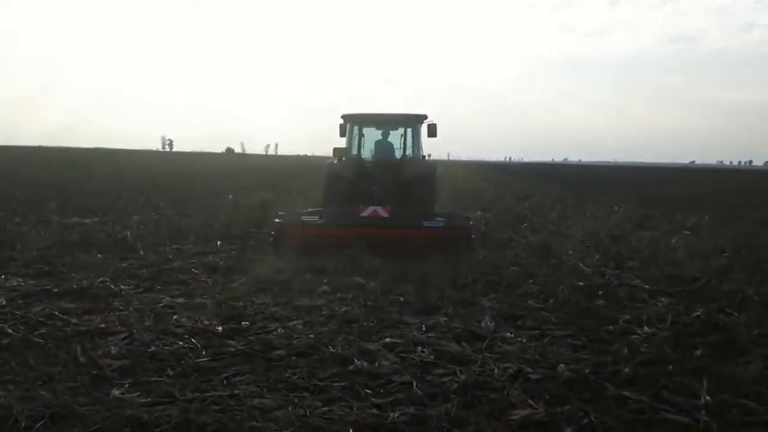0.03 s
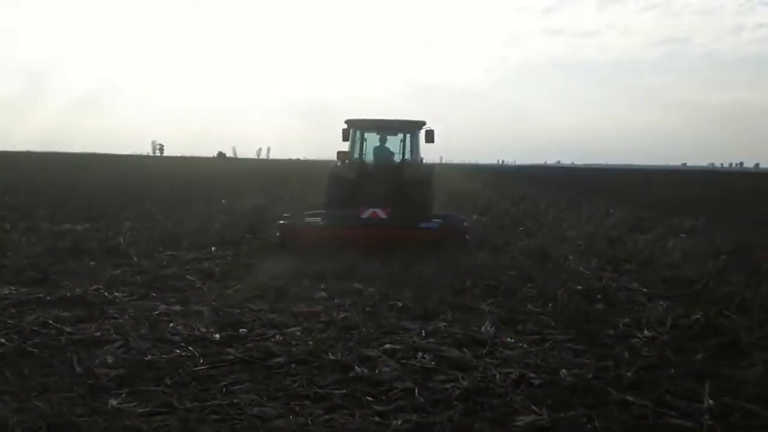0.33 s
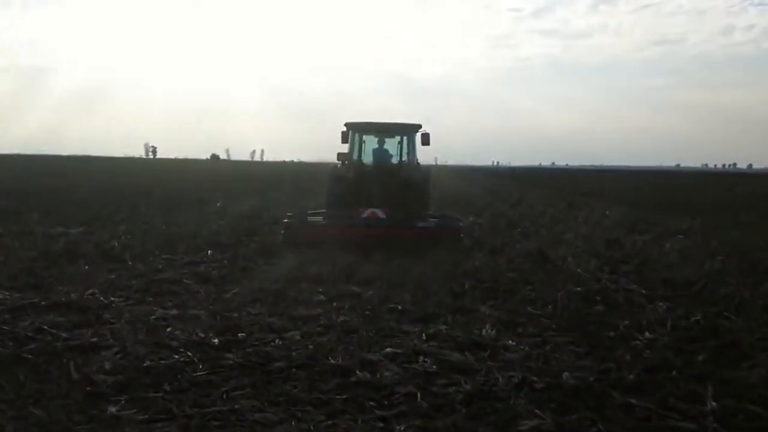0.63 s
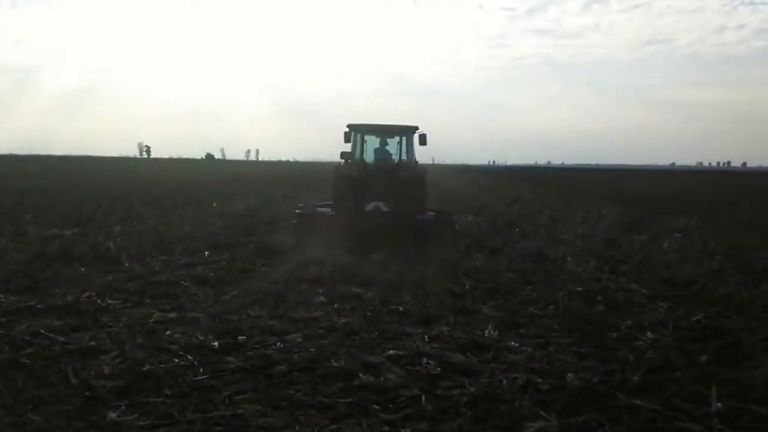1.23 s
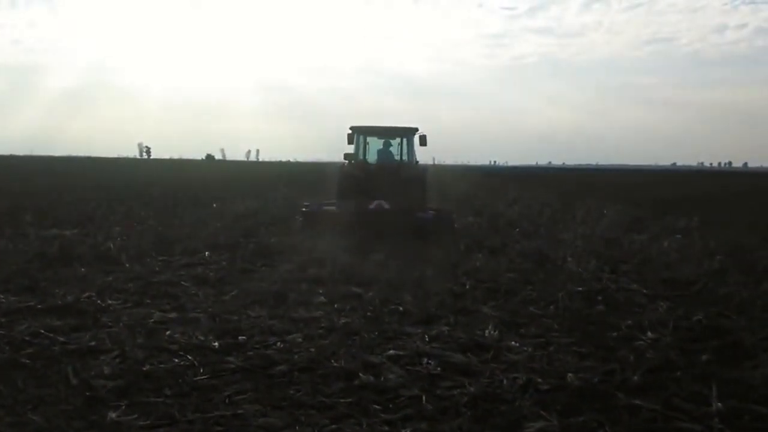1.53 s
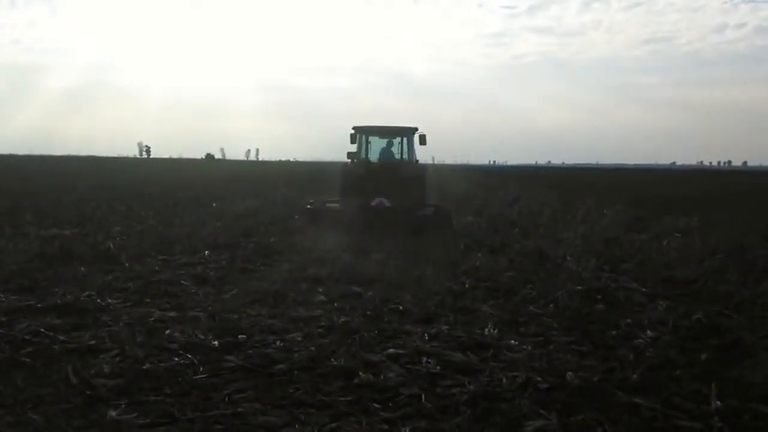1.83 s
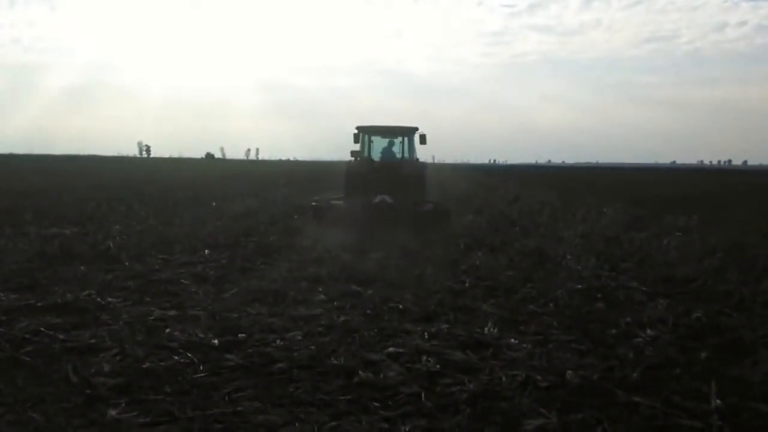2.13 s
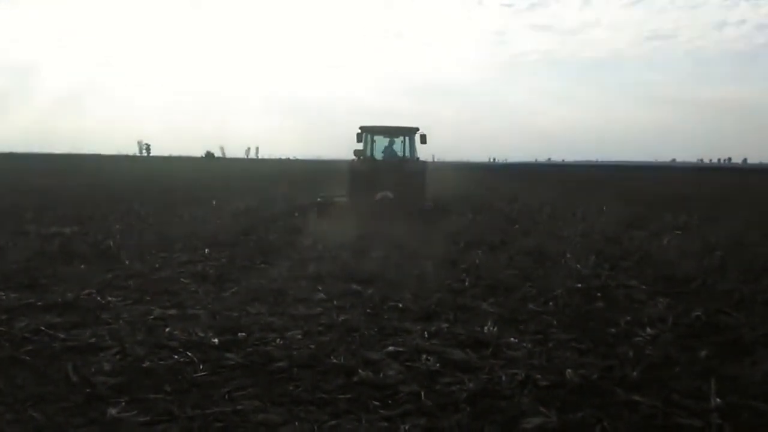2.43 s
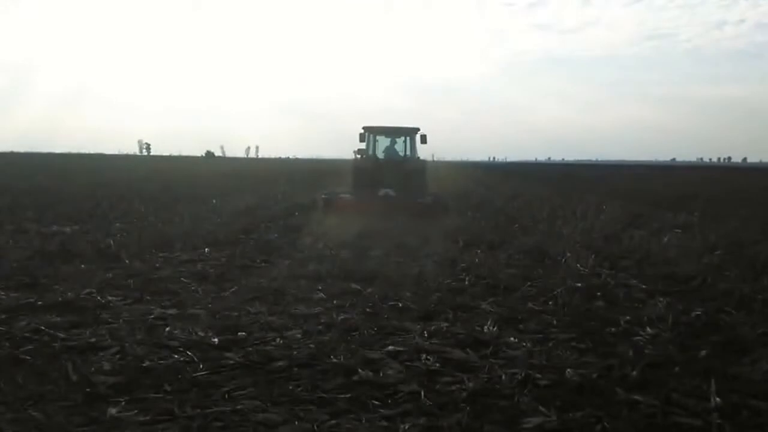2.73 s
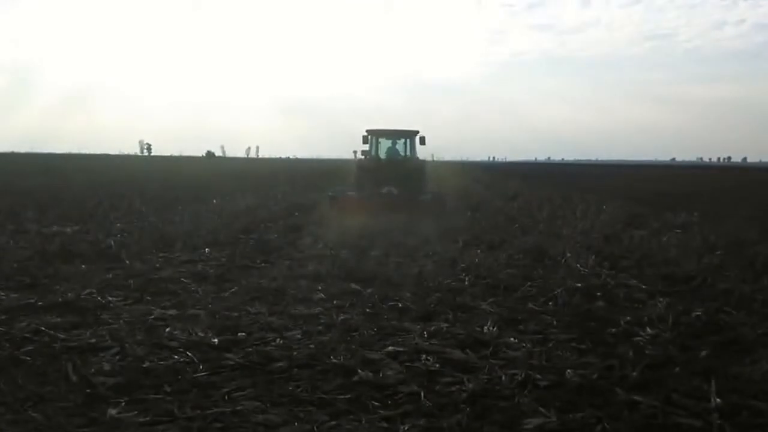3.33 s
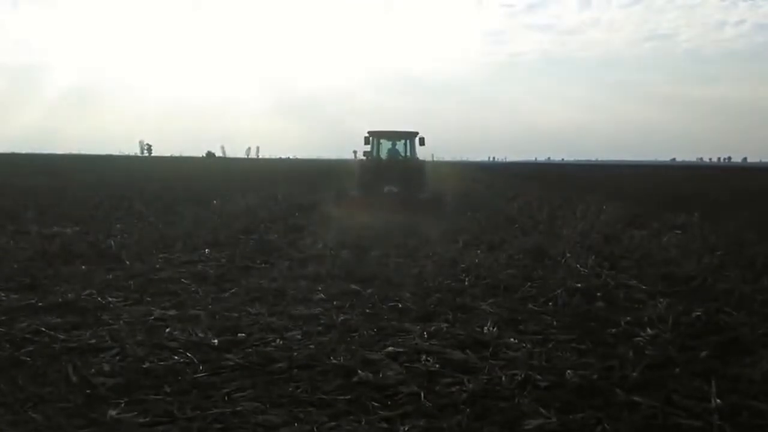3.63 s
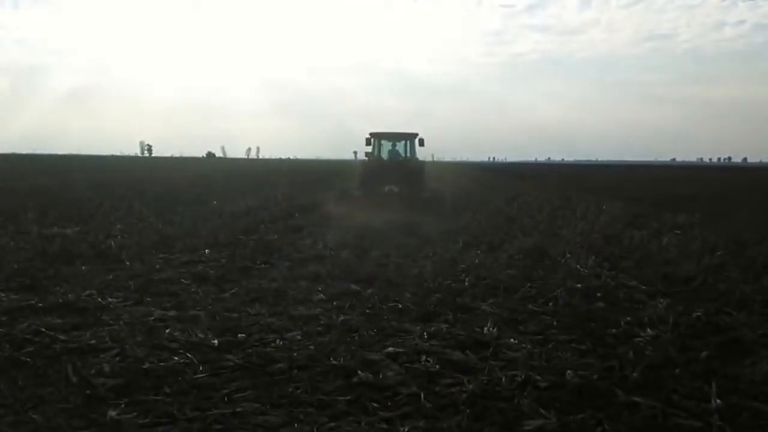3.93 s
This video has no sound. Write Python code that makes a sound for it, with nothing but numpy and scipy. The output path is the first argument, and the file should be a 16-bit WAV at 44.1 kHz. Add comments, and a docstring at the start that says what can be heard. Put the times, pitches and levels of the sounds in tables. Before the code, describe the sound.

A tractor engine drones and clatters as it pulls a shredder across an open field. Dry stalks crack irregularly against the steel hood and chaff hisses out. Heard from behind, it gradually grows fainter.

```python
"""Tractor shredding dry stalks

A four-cylinder tractor drives away over a field, pulling a flail shredder (swinging blades under a
steel hood). The exhaust drones, the engine block clatters and a fan slowly gains speed. Stalks crack
against the hood and chaff sprays out behind it. It is all heard in stereo, in the open air."""
import sys
import numpy as np
from scipy.fft import rfft, irfft, next_fast_len
from scipy.io import wavfile
from scipy.ndimage import map_coordinates

SR = 44100
rng = np.random.default_rng(int(sys.argv[2]) if len(sys.argv) > 2 else 0)


def dump_mix(stems):
    """Bounce the given channels to the path in sys.argv[1] as a 16-bit WAV at rate SR."""
    frames = np.atleast_2d(stems).T  # one column per channel
    limited = np.clip(frames, -1, 1)  # hard clip at full scale
    pcm = np.round(limited * 32767).astype(np.int16)
    wavfile.write(sys.argv[1], SR, pcm)


N = 176400  # 4 seconds
TOP_HZ = 15850  # upper edge of the treble


def amp(db):
    """Turn decibels into a plain multiplier."""
    return 10 ** (np.asarray(db) / 20)


def unit(x):
    """Scale a signal to an average power of 1."""
    return x / np.sqrt(np.mean(x ** 2) + 1e-20)


def along(points, hz):
    """Read between (frequency, value) points, with octaves evenly spaced."""
    freqs, values = np.transpose(points)
    return np.interp(np.log(hz + 1), np.log(freqs + 1), values)


def curves(rows):
    """Join a table's rows over time: one curve for each column after the first."""
    times, *columns = np.transpose(rows)
    return [np.interp(np.arange(N) / SR, times, column) for column in columns]


def wobble(rate, size=N):
    """A smooth curve through `rate` random values a second."""
    values = rng.standard_normal(size // 8 + 8)
    return map_coordinates(values, [np.arange(size) * rate / SR + 2], mode="mirror")


def filtered(x, response):
    """Turn each frequency up or down, and delay it, as response(hz) says."""
    n = x.shape[-1]
    padded = next_fast_len(n + 8192)
    return irfft(rfft(x, padded) * response(np.fft.rfftfreq(padded, 1 / SR)), padded)[..., :n]


def noise(gain, size=N):
    """Two noises shaped by gain(hz): one for direct sound, one for scattered sound."""
    return unit(filtered(rng.standard_normal((2, size)), gain))


def resonance(hz, centre, width):
    """A filter that rings at one pitch: the narrower, the longer."""
    return 1j * hz * width / (centre ** 2 - hz ** 2 + 1j * hz * width)


# The fan's hum (time [s], blades passing [Hz], level [dB])
FAN_HUM = [(0, 146, -32.5), (1.3, 156.7, -31), (3, 163.4, -31), (3.9, 172.7, -28.5)]

def fan():
    """The cooling fan's blades make a hum that creeps up in pitch."""
    hz, db = curves(FAN_HUM)
    level = np.sqrt(2) * amp(db + 0.8 * wobble(rate=4))
    phase = 2 * np.pi * np.cumsum(hz) / SR + 0.47 * wobble(rate=3.2)
    return level * np.sin(phase) * [[1], [0]]  # direct sound only


# The pipe's hollow ring (time [s], level [dB])
PIPE_LEVEL = [(0, -28), (.72, -26.5), (2.8, -34.5), (4, -44)]

def pipe(ring_hz=285.9, width_hz=20.7):
    """Flowing gas makes the exhaust pipe ring hollowly."""
    return amp(curves(PIPE_LEVEL)[0]) * noise(lambda hz: resonance(hz, ring_hz, width_hz) ** 2)


# The engine's clatter (time [s], relative level [dB])
CLATTER_LEVEL = [(0, -27.5), (1.4, -27.5), (2, -28.5), (2.8, -27.5), (3.55, -31), (3.92, -25)]
# What the engine block lets through (frequency [Hz], gain [dB])
BLOCK_TONE = [(250, -22), (420, -10), (670, 1.5), (790, 0), (1000, -11.5), (2200, -16.5), (9000, -77)]

def clatter(firings, rough_db=2):
    """Knocks that repeat every four firings and the pulsing noise of burning fuel shake the block."""
    block = lambda hz: amp(along(BLOCK_TONE, hz))
    places, sizes = rng.random(40), rng.standard_normal(40)  # 40 knocks in each engine cycle
    cycles = np.arange(int(firings[-1] / 4))[:, None]
    at = np.interp(4 * (cycles + places), firings, np.arange(N))
    hits = sizes * amp(0.83 * rng.standard_normal(at.shape))
    clicks = np.bincount(at.astype(int).ravel(), hits.ravel(), N)
    knocks = unit(filtered(clicks, block)) * [[1], [0]]
    burning = noise(block) * (1 + 0.35 * np.cos(2 * np.pi * firings))
    level = amp(curves(CLATTER_LEVEL)[0] + 2.05 * wobble(rate=13) - 6)
    return level * (knocks + amp(rough_db) * burning)


# The growl under the hood (time [s], level [dB])
CHURN_LEVEL = [(0, -27.5), (.16, -18), (.55, -29), (1.32, -26.5), (1.7, -63)]
# Pitches at which the air there rings (pitch [Hz], width [Hz], relative level [dB])
AIR_RINGS = [(374, 88, -9), (500, 24, -7), (590, 90, -4.5), (664, 77, -2), (790, 180, -7)]

def churn(swell_db=4, rough_db=2):
    """The flails beat the air under the hood into a rough growl whose pitches swell at random."""
    growl = sum(amp(db + swell_db * wobble(rate=14)) * noise(lambda hz: resonance(hz, pitch, width) ** 2)
                for pitch, width, db in AIR_RINGS)
    return amp(curves(CHURN_LEVEL)[0]) * unit(growl * amp(rough_db * wobble(rate=90)))


# How loud the high hiss is as it swells and fades (time [s], relative level [dB])
SPRAY_LEVEL = [(0, -32), (.15, -22), (.27, -30.5), (.37, -22.5), (.55, -29), (.66, -25), (.95, -30.5),
               (1.04, -27.5), (1.14, -34.5), (1.22, -26.5), (1.32, -23), (1.4, -35), (1.53, -29),
               (1.7, -40), (1.9, -33.5), (2.15, -33.5), (2.67, -44.5), (2.74, -37), (2.97, -41),
               (3.07, -39.5), (3.31, -38.5), (3.44, -43), (3.6, -35.5), (3.76, -42), (3.83, -34.5)]
# The tone of the hiss (frequency [Hz], gain [dB])
CHAFF_TONE = [(900, -17.5), (1700, 0.5), (2500, -1), (3050, 0), (3700, 3), (5500, -1), (8000, 1),
              (12000, -4), (15500, -10)]

def spray(boost_db=7):
    """Dry chaff flies out behind the shredder with a grainy hiss."""
    grains = amp(-0.5 * wobble(rate=370) + 1.47 * wobble(rate=90))
    hiss = noise(lambda hz: amp(along(CHAFF_TONE, hz)))
    return amp(curves(SPRAY_LEVEL)[0] + boost_db) * unit(hiss * grains)


# The hood's overall tone (frequency [Hz], gain [dB])
HOOD_TONE = [(380, -27), (600, -9), (780, -3.5), (950, -10), (1300, -1.5), (3800, -2), (5500, -9.5),
             (12000, -23), (15500, -72)]
# Pitches at which its steel rings (pitch [Hz], width [Hz], boost [dB])
HOOD_RINGS = [(817, 120, 5.5), (1167, 280, 5), (1720, 72, 6), (2113, 50, 8.5), (2584, 30, 5.5)]

def hood(hz):
    """The steel hood favours its own pitches in whatever hits it."""
    rings_db = sum(db / (1 + ((hz - pitch) / (width / 2)) ** 2) for pitch, width, db in HOOD_RINGS)
    return amp(along(HOOD_TONE, hz) + rings_db)


def snaps(per_second=420, middle_hz=1886, spread_octaves=0.75, fade_cycles=14, scatter_db=3.2):
    """Small stalks break at random, each with a short woody ring."""
    count = int(per_second * N / SR)
    t = np.arange(SR // 30) / SR
    at = rng.integers(N, size=(count, 1)) + np.arange(len(t))
    hz = np.minimum(middle_hz * 2 ** (spread_octaves * rng.standard_normal((count, 1))), TOP_HZ)
    strength = amp(scatter_db * np.minimum(rng.exponential(size=(count, 1)), 3.5))
    rings = strength * np.sqrt(hz) * np.sin(2 * np.pi * hz * t) * np.exp(-hz * t / fade_cycles)
    return unit(np.bincount(at.ravel(), rings.ravel(), N)[:N])


# The ongoing chopping (time [s], level [dB])
CHOPPING_LEVEL = [(0, -63), (.17, -18), (.3, -35), (.6, -30.5), (.76, -14), (1.15, -24), (1.27, -17),
                  (1.4, -22.5), (1.52, -21), (1.7, -27), (2.15, -23), (2.5, -28), (3.45, -39.5), (4, -32)]

def chopping():
    """Countless small stalks crackle and snap in clumps and set the hood ringing."""
    hiss = rng.standard_normal((2, N))
    crackle = unit(hiss * amp(-0.5 * wobble(rate=670) - 4.2 * wobble(rate=35)))
    breaking = crackle + np.array([snaps(), snaps()])
    return amp(curves(CHOPPING_LEVEL)[0]) * unit(filtered(breaking, hood))


# The deep note of the cylinders firing (time [s], level [dB])
DRONE_LEVEL = [(0, -15.5), (.2, -16), (.33, -9.5), (.52, -17.5), (1.13, -9.5), (1.42, -13), (1.54, -15.5),
               (1.94, -11), (2.12, -17), (2.3, -13), (2.6, -17), (3.1, -19), (3.78, -22), (3.94, -12.5),
               (4, -15.5)]
# The level that the other tones and the rumble follow (time [s], level [dB])
RUMBLE_LEVEL = [(0, -20), (.13, -18.5), (.26, -25.5), (.6, -24.5), (.87, -19), (1.5, -22.5), (1.59, -16.5),
                (1.69, -23.5), (1.9, -20.5), (2.3, -22.5), (2.55, -27), (3.5, -30), (4, -26)]
# Other tones of the exhaust and drive line (pitch [times the firing rate], relative level [dB])
ENGINE_TONES = [(.56, -12), (2, -4.5), (2.78, -13), (5.17, -22)]
# The rumble's tone (frequency [Hz], gain [dB])
RUMBLE_TONE = [(15, -30), (38, 0.5), (100, -2.5), (175, 1.5), (225, -5), (290, -11), (470, -28),
               (1500, -91)]

def exhaust(firings, rumble_swing=1.27):
    """The firings blend into a drone, with wavering tones and a rumble that puffs at each firing."""
    level_db, = curves(RUMBLE_LEVEL)
    tones = amp(curves(DRONE_LEVEL)[0]) * np.exp(2j * np.pi * firings)
    for multiple, db in ENGINE_TONES:
        level = amp(level_db + db + 3.3 * wobble(rate=6.6))
        phase = 2 * np.pi * (multiple * firings + rng.random()) + 0.35 * wobble(rate=9)
        tones += level * np.exp(1j * phase)
    rumble = noise(lambda hz: amp(along(RUMBLE_TONE, hz)))
    puffs = 1 + 0.14 * np.cos(2 * np.pi * firings)
    rumble = unit(rumble * puffs * amp(2 * wobble(rate=24)))
    # The rumble swells and fades more than the tones do.
    rumble_db = level_db.mean() + rumble_swing * (level_db - level_db.mean())
    scattered = tones.imag * wobble(rate=2.5)
    return np.sqrt(2) * np.array([tones.real, scattered]) + amp(rumble_db) * rumble


# Stalks hitting the hood (time [s], relative level [dB], crunch length [s], ring pitch [Hz],
# boom [dB], clank [dB], snap [dB]); the last three shape the tone and add to the level
STALK_HITS = [(0.638, -4, 0.012, 785, -14.5, -30, -20.5), (0.723, 3, 0.011, 765, -13.5, -21, -28.5),
              (0.781, -4.5, 0.018, 2600, -20, -28, -20), (0.841, -1.5, 0.032, 2616, -26, -24, -25),
              (0.885, -12, .018, 2010, -2.5, -9, -21), (0.976, -8.5, 0.019, 1630, -26, -7.5, -16.5),
              (1.02, -3, 0.037, 1230, -24, -14.5, -19.5), (1.232, 0.5, 0.016, 1314, -23, -13.5, -24.5),
              (1.329, -7.5, 0.0077, 623, -9, -17, -25), (1.473, -3, 0.016, 1277, -14.5, -16.5, -28.5),
              (1.556, -11.5, 0.013, 773, -8, -13.5, -28), (1.643, -19, 0.021, 2610, -40, -2.5, -32),
              (1.859, -4, .018, 2610, -11.5, -19, -21.5), (1.944, -15, 0.015, 1700, -10, -13, -17),
              (2.039, -5.5, 0.011, 1330, -12.5, -17, -27), (2.126, -18, 0.04, 1320, -4, -13, -39),
              (2.212, -12, .018, 1800, -11, -11, -25.5), (2.351, -17, 0.015, 2634, -5.5, -8.5, -22),
              (2.456, -15, 0.0085, 2300, -6, -10, -30), (2.599, -14.5, .012, 1694, -36, -5.5, -28.5),
              (2.708, -18, 0.017, 1880, -35, -6, -29.5), (2.8, -8.5, .016, 778, -10.5, -10.5, -33),
              (2.856, -21, 0.0083, 4680, 1, -1.5, -16), (3.039, -8, 0.012, 1680, -15.5, -13.5, -26.5),
              (3.177, -21, 0.0087, 1680, -24, -1.5, -34), (3.285, -18.5, 0.017, 2140, -6.5, -12, -27),
              (3.799, -17.5, 0.042, 2282, -25, -12, -46), (3.944, -13.5, 0.015, 1670, -28, -5, -26.5)]
# Where boom, clank and snap sit (frequency [Hz])
HIT_BAND_HZ = [640, 1440, 3200]
# Their extra weight in the tone (gain [dB])
HIT_BAND_DB = [-3.5, -2, 10]

def strikes(attack_s=0.002, crunch_fade_s=0.085, debris_fade_s=0.48, debris_db=-7.5):
    """Each stalk bursts against the hood and rings at its own pitch, then its splinters rattle on."""
    crack_hz, crack_db = 2450, -15.5  # the crack that all hits share
    ring_sharpness, ring_db = 21.6, 8
    size = SR // 4
    out, t = np.zeros((2, N + size)), np.arange(size) / SR
    for time, db, length, ring_hz, *bands in STALK_HITS:
        crunch = amp(-60 * np.maximum(t - length, 0) / crunch_fade_s)
        debris = amp(debris_db - 60 * t / debris_fade_s)
        shape = np.minimum(t / attack_s, 1) * (crunch + debris)
        random_tone = np.transpose([np.geomspace(500, 12000, 60), 3 * rng.standard_normal(60)])
        band_tone = sorted([*zip(HIT_BAND_HZ, np.add(bands, HIT_BAND_DB)), (crack_hz, crack_db)])
        burst = noise(lambda hz: hood(hz) * amp(along(random_tone, hz) + along(band_tone, hz)), size)
        ragged = shape * burst * amp(2.4 * wobble(rate=420, size=size))
        ring = lambda hz: 1 + amp(ring_db) * resonance(hz, ring_hz, ring_hz / ring_sharpness)
        hit = unit(filtered(ragged, ring)) * np.sqrt(np.mean(shape ** 2))
        level = amp(db - 0.5) * np.linalg.norm(amp([*bands, crack_db]))
        start = round((time - attack_s / 2) * SR)
        out[:, start:start + size] += level * hit
    return out[:, :N]


# How alike left and right are (frequency [Hz], likeness [0 to 1])
LIKENESS = [(60, .96), (700, .96), (1700, .9), (3500, .72), (7000, .48), (14000, .1)]
# Which side is louder (frequency [Hz], left minus right [dB])
LEFT_BALANCE = [(60, 0.5), (300, 1), (530, -8.5), (850, 9.5), (1100, -12), (1500, 7.5), (1900, -6),
                (2300, 10.5), (2750, -5.5), (4800, -7.5), (10500, -4), (12000, -10.5), (15000, -16)]
# Which side comes first (frequency [Hz], left ahead by [radians])
LEFT_LEAD = [(0, 0), (700, -.1), (950, -1.4), (1300, -.7), (1850, -2.7), (2150, -1.8), (2450, -3.3),
             (2650, -6), (2950, -9.4), (4100, -9.3), (5800, -11.9), (6900, -15.9), (10800, -22)]

def stereo(pair):
    """Direct and scattered sound reach left and right with a different tone and delay."""
    def blend(hz):
        angle = np.arccos(np.clip(along(LIKENESS, hz), 0, 1)) / 2
        return np.array([np.cos(angle), np.sin(angle)])

    def left_and_right(hz):
        sides = np.array([[0.5], [-0.5]])
        gain = amp(sides * along(LEFT_BALANCE, hz))
        lead = np.interp(hz, *np.transpose(LEFT_LEAD))
        return gain / np.sqrt(np.mean(gain ** 2, axis=0)) * np.exp(1j * sides * lead)

    direct, scattered = filtered(pair, blend)
    return filtered(np.array([direct + scattered, direct - scattered]), left_and_right)


# How fast the cylinders fire (time [s], firing rate [Hz])
FIRING_RATE = [(0, 60.23), (.35, 62.35), (1.1, 64.57), (3.6, 65.37), (3.95, 63.27)]

def scene():
    """The tractor and its shredder, heard from behind."""
    firing_hz = curves(FIRING_RATE)[0] + 0.18 * wobble(rate=8)
    firings = np.cumsum(firing_hz) / SR  # running count of firings
    return stereo(exhaust(firings) + fan() + pipe() + churn() + clatter(firings)
                  + strikes() + chopping() + spray())


def record(dry, ceiling=0.63):
    """Round off the highest peaks and cut the very top of the treble."""
    rounded = dry / (1 + np.abs(dry / ceiling) ** 6) ** (1 / 6)
    return filtered(rounded, lambda hz: hz < TOP_HZ)


dry = scene()
out = record(dry)
dump_mix(out)
```